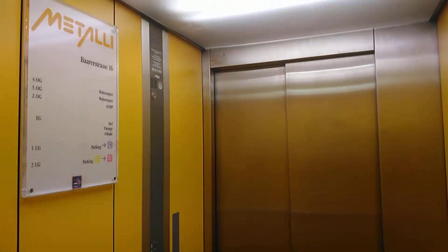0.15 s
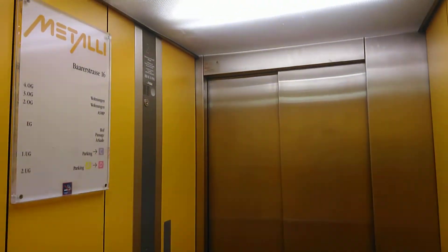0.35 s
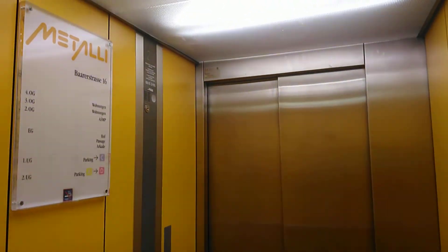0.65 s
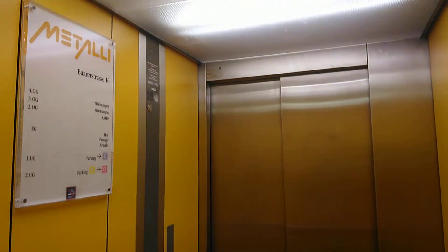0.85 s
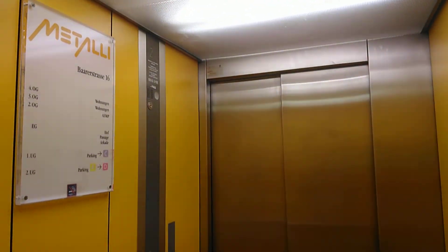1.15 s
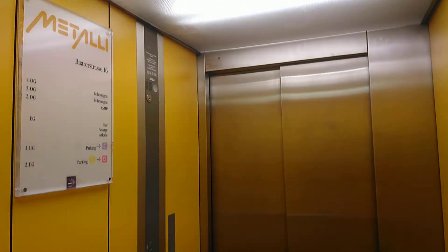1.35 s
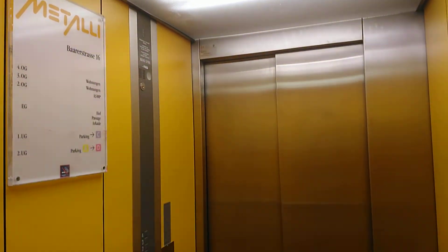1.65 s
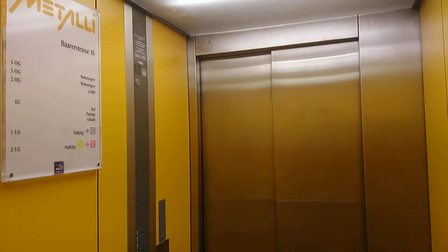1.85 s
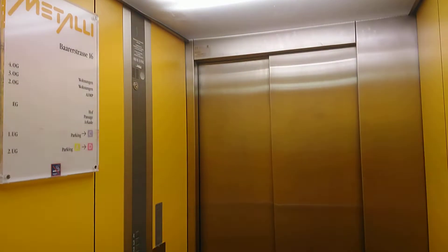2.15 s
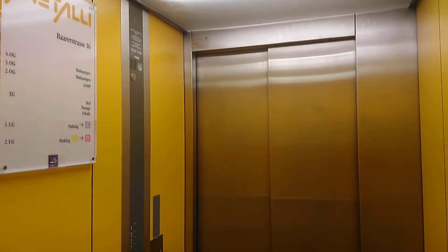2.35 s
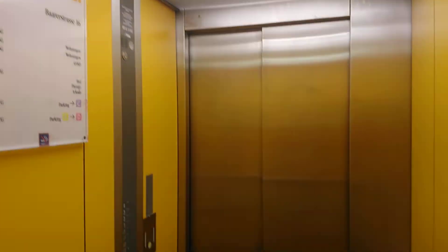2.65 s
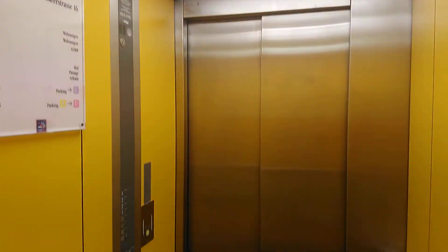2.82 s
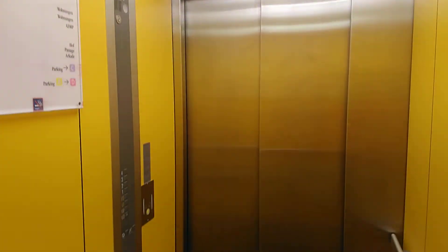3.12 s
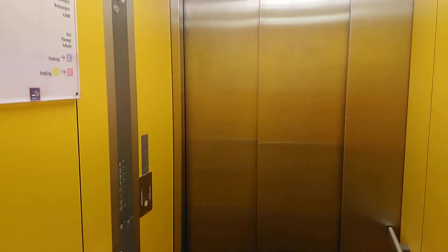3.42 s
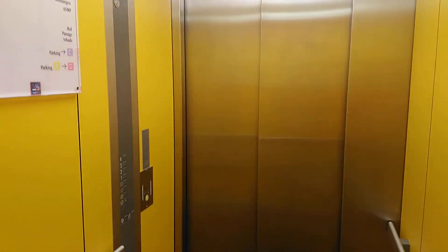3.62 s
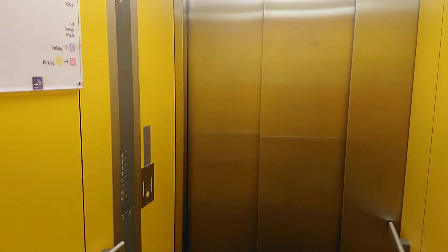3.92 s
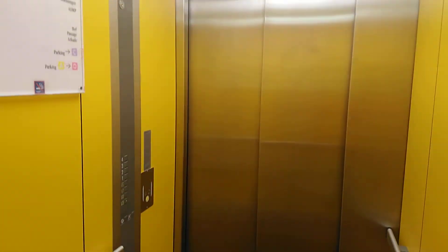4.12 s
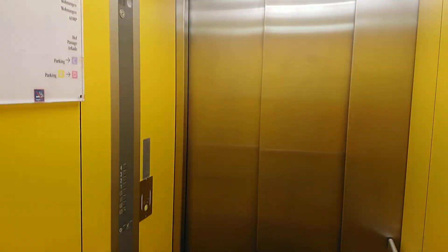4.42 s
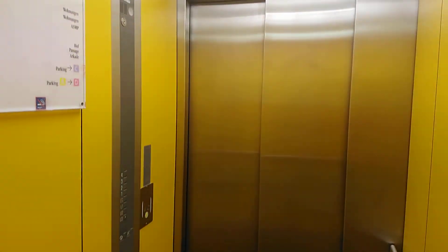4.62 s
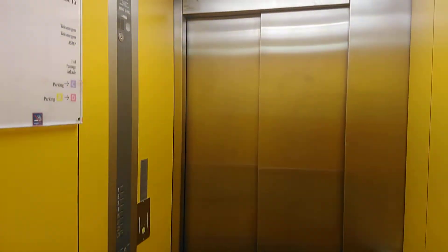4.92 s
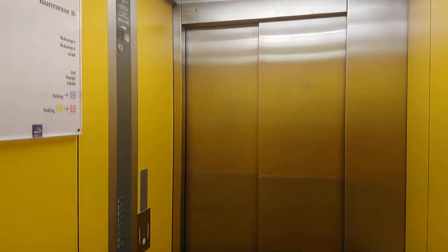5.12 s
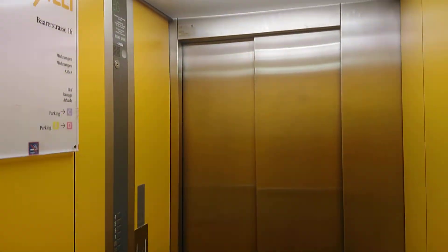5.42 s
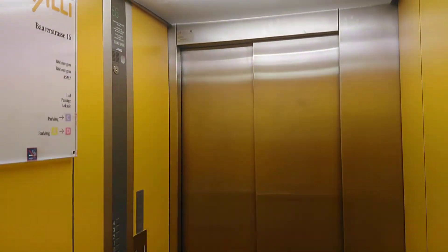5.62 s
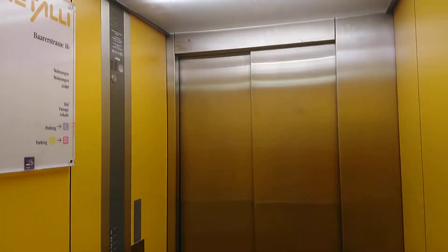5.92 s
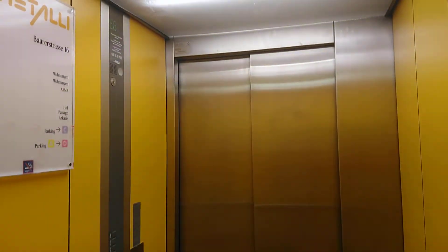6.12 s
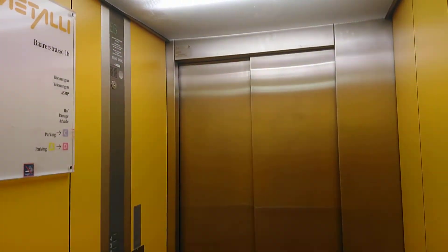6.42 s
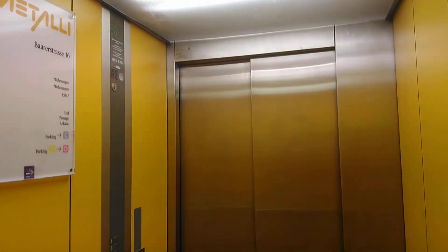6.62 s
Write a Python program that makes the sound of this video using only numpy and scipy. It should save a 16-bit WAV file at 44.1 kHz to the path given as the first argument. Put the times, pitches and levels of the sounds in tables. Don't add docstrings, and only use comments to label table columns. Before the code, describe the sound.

Inside a small moving lift car: a deep steady drive hum swells and sinks over low rumble, with sparse ticks and one brief metallic latch rattle.

```python
import sys
import numpy as np
from scipy import signal
from scipy.fft import irfft, next_fast_len
from scipy.io import wavfile
from scipy.ndimage import uniform_filter1d

SR = 44100
rng = np.random.default_rng(int(sys.argv[2]) if len(sys.argv) > 2 else 0)


def wrap_up_sound(samples):
    columns = np.atleast_2d(samples).T
    tamed = np.clip(columns, -1, 1)
    steps = np.round(tamed * 32767).astype(np.int16)
    wavfile.write(sys.argv[1], SR, steps)


def gain_from_decibels(decibels):
    exponent = np.asarray(decibels, float) / 20
    return 10 ** exponent


N = 298333


def rms_one(x):
    return x / np.sqrt(np.mean(x ** 2) + 1e-20)


def in_time(rows):
    s, *columns = np.transpose(rows)
    return [np.interp(np.arange(N) / SR, s, column) for column in columns]


def at_hz(points, hz):
    point_hz, values = np.array(points)[:, :2].T
    return np.interp(np.log(hz), np.log(point_hz), values)


def drift(rate_hz):
    r = np.exp(-80 * np.pi * rate_hz / SR)
    slow = signal.lfilter([1], [1, -2 * r, r * r], rng.standard_normal(N // 40 + 2002))[2000:]
    return np.interp(np.arange(N) / 40, np.arange(len(slow)), rms_one(slow - slow.mean()))


def pan(x, lr_db):
    return x * gain_from_decibels(np.array([[lr_db / 2], [-lr_db / 2]]))


def resonate(x, hz, width_hz):
    r = np.exp(-np.pi * width_hz / SR)
    poles = [1, -2 * r * np.cos(2 * np.pi * hz / SR), r * r]
    return signal.lfilter((1 - r * r) / 2 * np.array([1, 0, -1]), poles, x)


def ring(clicks, hz, t60_s):
    r = gain_from_decibels(-60 / (t60_s * SR))
    w = 2 * np.pi * hz / SR
    return signal.lfilter([0, np.sin(w)], [1, -2 * r * np.cos(w), r * r], clicks)


def diffuse(shape):
    # hz, likeness (-1 to 1)
    likeness = [(60, 0.63), (125, 1), (170, 0.96), (250, 1), (500, 0.57), (800, 0.83), (1200, -0.35),
                (2000, -0.012), (4000, 0.038), (12000, -0.098)]
    # hz, left_minus_right_db
    lr_tilt = [(60, 0), (150, 0), (250, -.8), (600, .5), (1290, -1.5), (2380, -.5), (4400, 0), (8120, 1.5),
               (15000, 1.5)]
    size = next_fast_len(N)
    hz = np.maximum(np.arange(size // 2 + 1) * SR / size, 1)
    re, im = rng.standard_normal((2, 2, len(hz)))
    mid, side = (re + 1j * im) * shape(hz)
    alike = np.clip(at_hz(likeness, hz), -1, 1)
    half_tilt = at_hz(lr_tilt, hz) / 2
    pair = np.sqrt(1 + alike) * mid + np.sqrt(1 - alike) * side * [[1], [-1]]
    return irfft(pair * gain_from_decibels(np.array([half_tilt, -half_tilt])), size)[:, :N]


def modal_noise(modes):
    def power(f):
        return sum(gain_from_decibels(2 * db) / width / (1 + (2 * (f - hz) / (1.23 * width)) ** 2) ** 2
                   for hz, width, db in modes)
    return diffuse(lambda f: np.sqrt(power(f)))


def tone(turns, level_db):
    return np.sqrt(2) * gain_from_decibels(level_db) * np.sin(2 * np.pi * turns)


def hums():
    # time_s, level_db
    drive = [(0, -30), (.45, -25.5), (1.05, -21.5), (1.6, -22.5), (2.1, -25), (2.65, -24.5), (3.05, -30.5),
             (3.5, -32.5), (4.06, -38), (4.6, -34), (4.95, -29), (5.19, -37), (5.4, -28), (5.72, -22.5),
             (6.1, -24.5), (6.76, -24.5)]
    # time_s, level_db
    mains = [(0.0, -38), (0.07, -36), (0.62, -35.5), (1.32, -43), (1.75, -39.5), (2.07, -44), (2.96, -34.5),
             (3.97, -44), (4.78, -39.5), (5.12, -33), (6.72, -35), (6.76, -39)]
    # start_s, length_s, swell_s (side tones in step with the hum), swells_hz, lower_side_db
    rough_rail = [
        (-.2, .65, .1, 4.66, -39.5),
        (0.605, 0.69, 1.114, 5.3, -51),
        (1.303, 0.81, 1.795, 5.3, -47),
        (2.547, 0.69, 2.783, 7.6, -40.5),
        (3.338, 0.67, 3.839, 5.12, -38),
        (3.95, 0.64, 4.192, 6.13, -38),
        (4.656, 0.46, 4.917, 6.24, -37),
        (5.74, 0.3, 5.967, 3.9, -43.5),
        (6.21, 0.55, 6.527, 6.6, -38.5),
    ]
    drive_hz, mains_hz = 71.12, 100.03
    upper_side_db = -7
    t = np.arange(N) / SR
    out = tone(drive_hz * t, in_time(drive)[0]) + tone(mains_hz * t, in_time(mains)[0])
    for start_s, length_s, swell_s, swells_hz, lower_db in rough_rail:
        wobble = swells_hz * (t - swell_s)
        progress = np.clip((t - start_s) / length_s, 0, 1)
        stretch = np.sqrt(np.abs(np.sin(np.pi * progress)))
        lower = tone(drive_hz * t - wobble, lower_db)
        upper = tone(drive_hz * t + wobble, lower_db + upper_side_db)
        out += stretch * (lower + upper)
    return pan(out, 0)


def rail_rumble():
    # pitch_hz, width_hz, level_db
    car_modes = [(48.7, 3, -5), (52, 10, -4.5), (63, 13, 6.5), (78.3, 9.1, 2), (89.1, 8.4, 9),
                 (121.5, 16, -1), (156, 22, -8), (184.7, 11, -2.5), (203.4, 7.5, -12), (261.6, 27, -9),
                 (298.4, 23, -9.5), (315, 19, -10.5), (336.2, 14, -9.5), (359.3, 13, -21), (416, 20, -14),
                 (446, 14, -19), (462.7, 16, -17.5), (495, 11, -25), (572.6, 37, -16), (591.5, 7.3, -17.5),
                 (623, 33, -14), (716, 18, -19), (736, 18, -15.5), (783.3, 6, -18), (856, 17, -22),
                 (910, 62, -18), (1036, 37, -18), (1184, 49, -20)]
    # pitch_hz, width_hz, level_db
    boom_modes = [(243, 10, -2), (256, 12, 0)]
    # time_s, level_db
    bumps = [(.39, -65), (.92, -66.5), (1.36, -56), (1.71, -56), (1.99, -56.5), (2.15, -56), (2.92, -47.5),
             (3.11, -51.5), (3.31, -53), (3.66, -54), (4.01, -59), (4.35, -57), (4.61, -51), (4.78, -52),
             (4.97, -49.5), (5.46, -58), (6.05, -48.5), (6.22, -46), (6.47, -51), (6.7, -48)]
    jolt_s, boom_rest_db = 0.076, -60.5
    t = np.arange(N) / SR
    rumble = sum(gain_from_decibels(1.57 * drift(0.71)) * modal_noise(car_modes[k::3]) for k in range(3))
    level_db = -43.5 + 0.72 * t
    boom = modal_noise(boom_modes)
    boom = boom / np.sqrt(uniform_filter1d((boom ** 2).mean(0), size=12001))
    jolts = gain_from_decibels(boom_rest_db) + sum(gain_from_decibels(db) * np.exp(-((t - s) / jolt_s) ** 2) for s, db in bumps)
    return gain_from_decibels(level_db) * rms_one(rumble) + jolts * boom


def air_noise(spectrum, level_db, flicker_db):
    low, high = spectrum[0][0], spectrum[-1][0]
    air = diffuse(lambda f: gain_from_decibels(at_hz(spectrum, f)) * (f > low) * (f < high))
    return gain_from_decibels(level_db + flicker_db * drift(9.2)) * rms_one(air)


def shaft_air():
    # pitch_hz, density_db per Hz
    roar = [(22, -6.5), (32, 2), (44, 9.5), (60, 11), (110, 10), (220, -6.5), (380, -12.5), (520, -12.5),
            (900, -4.5), (1300, -5), (1700, -10), (2300, -12.5), (2900, -26)]
    # pitch_hz, density_db per Hz
    hiss = [(1410, -33.5), (2400, -6), (2990, -7), (3540, -5), (5150, -6), (5440, -4), (6980, -2),
            (10500, -17.5), (13900, -21.5), (14600, -21), (15500, -32.5)]
    # time_s, level_db
    draught = [(0, 4.5), (.5, 1.5), (1.07, -0.5), (1.41, 2), (2.3, -0.5), (3.3, -1.5), (4.8, -1),
               (5.5, 0.5), (5.9, 3), (6.25, 1), (6.76, 1)]
    draught_db, = in_time(draught)
    return (air_noise(roar, -54.5 + draught_db, flicker_db=1.0)
            + air_noise(hiss, -63 + 0.35 * draught_db, flicker_db=0.57))


def rubs(events, share, steady=False):
    out = np.zeros((2, N))
    for start_s, length_s, hz, level_db, lr_db in events:
        noise = rng.standard_normal((2, SR))[:, :round(length_s * SR)]
        band = rms_one(resonate(resonate(noise, hz, share * hz), hz, share * hz))
        if steady:
            band = band / np.sqrt(uniform_filter1d(band ** 2, size=331) + .05)
        size = band.shape[1]
        i = round(start_s * SR)
        out[:, i:i + size] += pan(gain_from_decibels(level_db) * band * signal.windows.tukey(size, .4), lr_db)
    return out


def cloth_rubs():
    # start_s, length_s, centre_hz, level_db, left_minus_right_db
    cloth = [
        (0, .276, 2020, -68.5, -4),
        (.67, .1, 600, -61, 0),
        (.8, 0.11, 550, -65, 5),
        (1.2, 0.24, 7400, -69.5, 13.5),
        (3.53, 0.12, 1690, -66.5, 6),
        (3.9, 0.3, 6400, -64.5, 4.5),
        (5.78, .1, 1300, -61, -1.5),
    ]
    return rubs(cloth, share=0.7)


def shoe_drags():
    # start_s, length_s, centre_hz, level_db, left_minus_right_db
    shoe = [
        (0, .2, 1020, -69, 1),
        (1.2, .4, 4400, -71.5, -8),
        (5.91, .093, 930, -56.5, 4),
        (6.0, 0.094, 7200, -79, -6),
        (5.777, .04, 4130, -62, 0),
        (5.8, .1, 4900, -67, 0),
    ]
    return rubs(shoe, share=0.06)


def shoe_squeaks():
    # start_s, length_s, centre_hz, level_db, left_minus_right_db
    squeal = [
        (0, .17, 1180, -60, 0),
        (0, .15, 3200, -75, 0),
        (5.865, 0.09, 4270, -65, 0),
        (5.95, .06, 4300, -75, 0),
        (6.005, .04, 4230, -64, 0),
        (6.035, 0.077, 4320, -67, 0),
        (6.003, 0.038, 3900, -69, 0),
    ]
    return rubs(squeal, share=0.01, steady=True)


def faint_rustles():
    # start_s, length_s, centre_hz, level_db, left_minus_right_db
    rustles = [
        (.24, .08, 11900, -76, 6),
        (1.76, 0.085, 2040, -77, -3),
        (2.73, 0.046, 11300, -76.5, 11),
        (3.528, .087, 10300, -80.5, 18),
        (4.35, 0.055, 11300, -79, 10),
    ]
    return rubs(rustles, share=0.35)


def ticks(events, modes):
    out = np.zeros((2, N))
    for start_s, peak_db, bright_db, lr_db in events:
        i = round(start_s * SR)
        for hz, db, t60_s in modes:
            click = np.zeros(SR // 4)
            contact = np.hanning(3 + int(.6 * SR / hz) * (hz < 4000))
            click[:len(contact)] = 1.4 * contact / contact.sum()
            neighbour = ring(click, min(1.12 * hz, 12600), t60_s / 2)
            body = ring(click, hz, t60_s) + 0.23 * neighbour
            octaves = np.log2(hz / modes[1][0])
            out[:, i:i + len(click)] += pan(gain_from_decibels(peak_db + db + bright_db * octaves) * body, lr_db)
    return out


def casing_ticks():
    # pitch_hz, level_db, t60_s
    casing = [(11030, 0, .006), (8800, -1, 0.0068), (7560, -5, 0.0078), (5060, -14, 0.0066),
              (3200, -9, .005)]
    # start_s, peak_db, brightness_db per octave, left_minus_right_db
    taps = [
        (.27, -71, 12, 5.5),
        (1.92, -74.5, 17, 1),
        (2.715, -72, 10, 6),
        (2.72, -58, 5, 11),
        (3.525, -63, 14, 1),
        (3.532, -58, -4, 8),
        (4.689, -47.5, 0.5, 9.5),
    ]
    return ticks(taps, casing)


def floor_knock():
    # pitch_hz, level_db, t60_s
    floor_plate = [(320, 1.5, 0.29), (458, -5.5, .12), (620, -6, 0.05), (900, -11, .04)]
    # start_s, peak_db, brightness_db per octave, left_minus_right_db
    knocks = [
        (.69, -43, 0.012, -6),
    ]
    return ticks(knocks, floor_plate)


def panel_ticks():
    # pitch_hz, level_db, t60_s
    panel = [(1930, 1, .012), (2520, -3, 0.0079), (4300, -18, .006), (5250, -13, .006)]
    # start_s, peak_db, brightness_db per octave, left_minus_right_db
    snaps = [
        (1.762, -51, 3, -7),
        (1.78, -56.5, -6, -1),
        (3.524, -45.5, 4, 1),
    ]
    return ticks(snaps, panel)


def rail_ticks():
    # pitch_hz, level_db, t60_s
    rail = [(1070, -2, 0.021), (3030, -12, 0.0072), (4300, -19, 0.0057)]
    # start_s, peak_db, brightness_db per octave, left_minus_right_db
    strikes = [
        (4.925, -42, -2.5, -1.5),
        (4.949, -39.5, 9, -5),
        (5.274, -58, -7, -3),
        (5.462, -54.5, -4, -3),
    ]
    return ticks(strikes, rail)


def latch():
    # time_s, peak_db
    hits = [
        (5.778, -53),
        (5.783, -55),
        (5.789, -51),
        (5.795, -62),
        (5.805, -62.5),
        (5.817, -55.5),
        (5.83, -60.5),
        (5.848, -62.5),
        (5.865, -66),
    ]
    # pitch_hz, level_db, t60_s
    plate = [(1400, -12, .06), (1900, -12, .06), (2400, -12, .06), (3250, -14, .05), (3850, -9, .05),
             (4850, -9, .06), (4910, -3, .1), (4968, -2, .14), (5060, -8, .06), (5950, -8, .04),
             (6560, 0, .15), (6645, -5, .1), (7135, -5, .1), (7215, -4, .12), (7268, 0, .16),
             (7450, -9, .06), (8330, -9, .1), (8420, -10, .1)]
    # centre_hz, width_hz, gain (negative is opposite phase)
    wash_bands = [(3730, 1600, 1), (6400, 2500, -1), (2170, 1500, 1.4), (12400, 1000, .22), (9500, 2000, .22),
                  (10800, 1500, .14), (2960, 1100, .4), (1100, 800, .5)]
    scrape_t60_s, wash_t60_s, wash_db = 0.022, 0.27, 2.5
    start, size = round(5.7 * SR), SR // 2
    power = np.zeros(size)
    power[[round(s * SR) - start for s, db in hits]] = gain_from_decibels(2 * np.array(hits)[:, 1])

    def dying(t60_s):
        return np.sqrt(signal.lfilter([1], [1, -gain_from_decibels(-120 / (t60_s * SR))], power))

    scrape = dying(scrape_t60_s)
    out = np.zeros((2, size))
    for hz, db, t60_s in plate:
        ringing = ring(scrape * rng.standard_normal((2, size)), hz, t60_s)
        out += gain_from_decibels(db - 67.0) * np.sqrt(t60_s / 0.071) * rms_one(ringing)
    noise = rng.standard_normal((2, size))
    wash = sum(gain * resonate(resonate(noise, hz, width), hz, width) for hz, width, gain in wash_bands)
    decay = uniform_filter1d(dying(wash_t60_s), size=101, origin=50)
    out += gain_from_decibels(wash_db) * decay * rms_one(wash)
    return np.pad(out, ((0, 0), (start, N - start - size)))


def scene():
    friction = cloth_rubs() + shoe_drags() + shoe_squeaks() + faint_rustles()
    impacts = casing_ticks() + floor_knock() + panel_ticks() + rail_ticks() + latch()
    return hums() + rail_rumble() + shaft_air() + friction + impacts


def top_cut(x):
    return signal.sosfilt(signal.butter(12, 15610, fs=SR, output="sos"), x)


def record(dry):
    return top_cut(dry)


dry = scene()
out = record(dry)
wrap_up_sound(out)
```